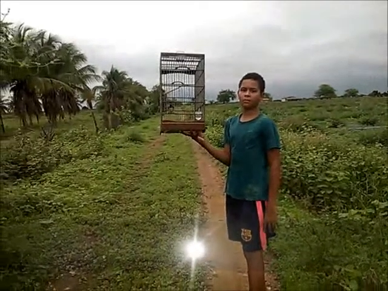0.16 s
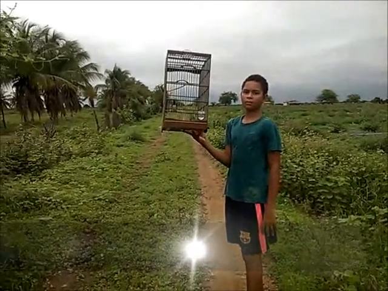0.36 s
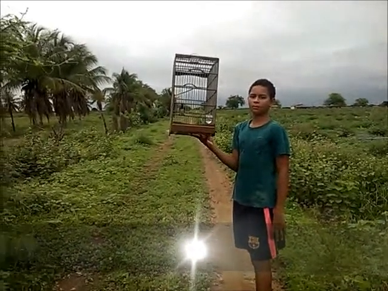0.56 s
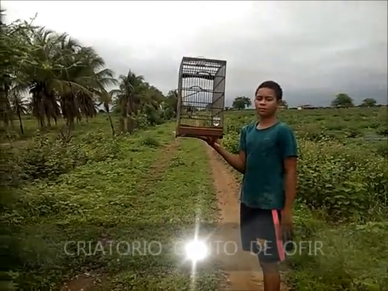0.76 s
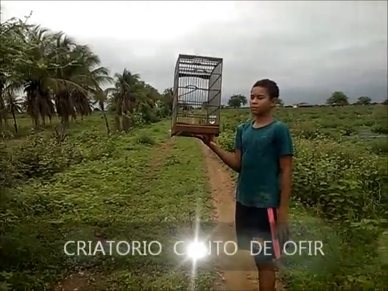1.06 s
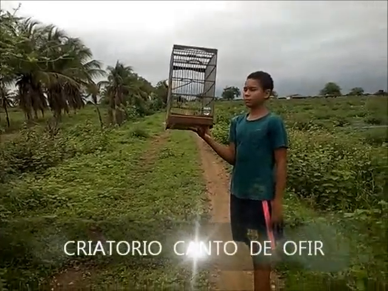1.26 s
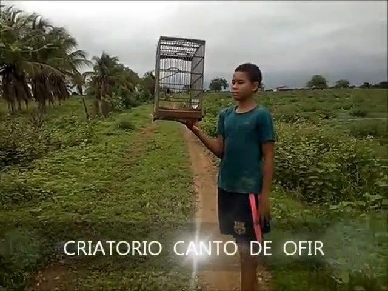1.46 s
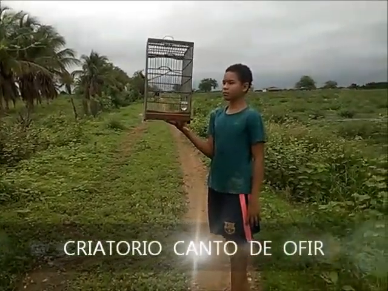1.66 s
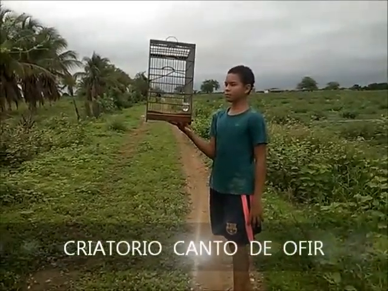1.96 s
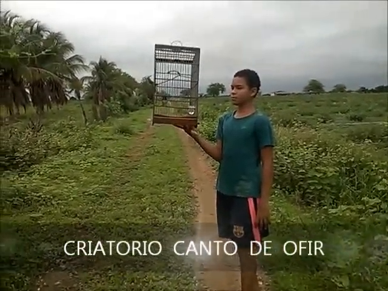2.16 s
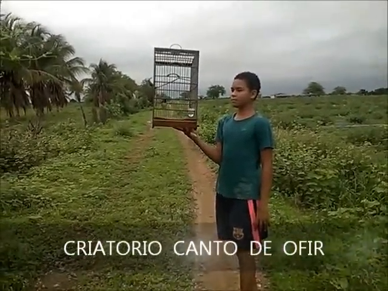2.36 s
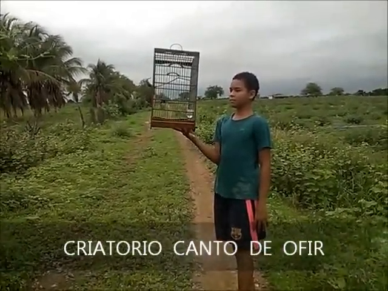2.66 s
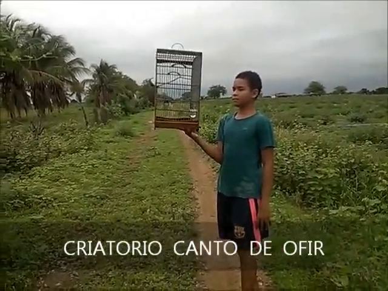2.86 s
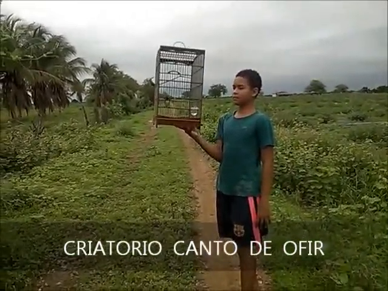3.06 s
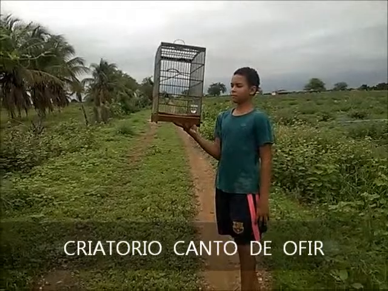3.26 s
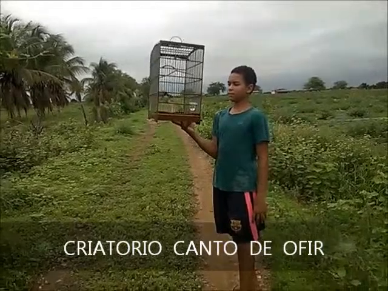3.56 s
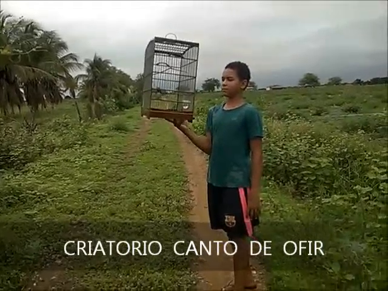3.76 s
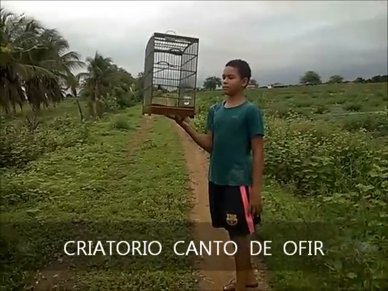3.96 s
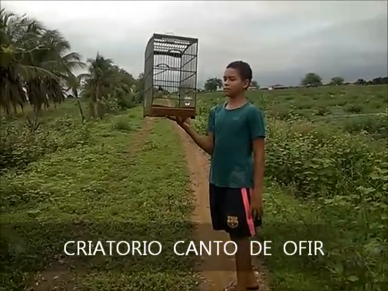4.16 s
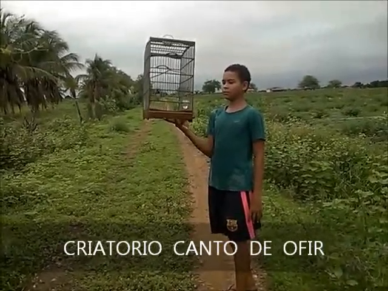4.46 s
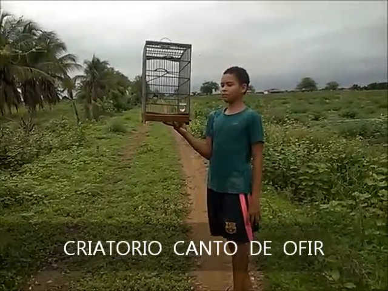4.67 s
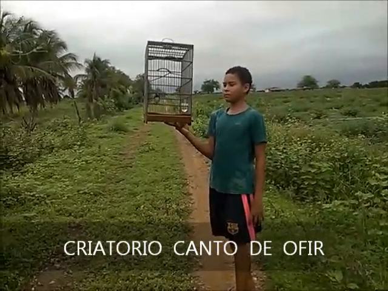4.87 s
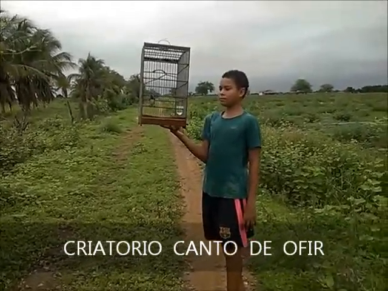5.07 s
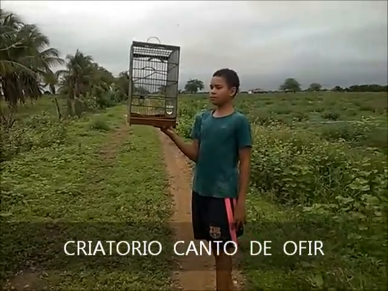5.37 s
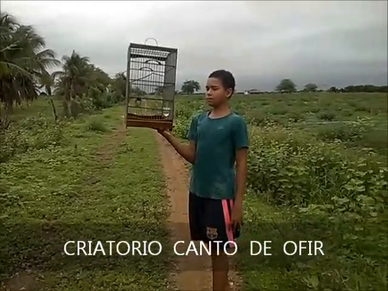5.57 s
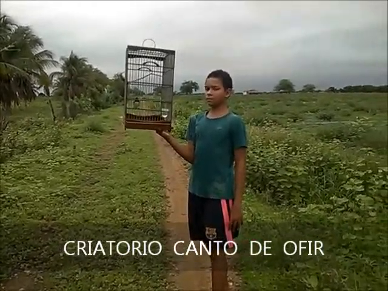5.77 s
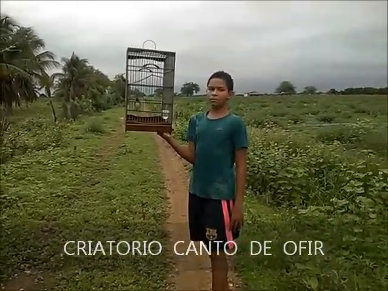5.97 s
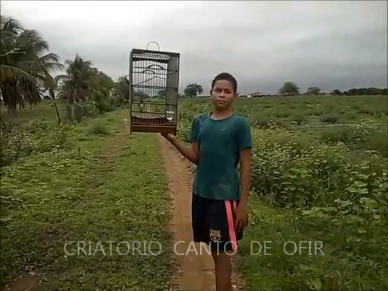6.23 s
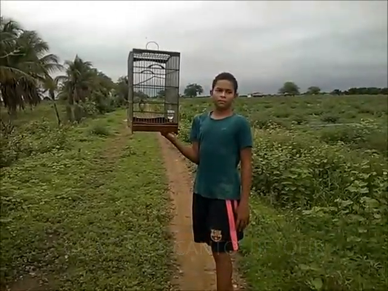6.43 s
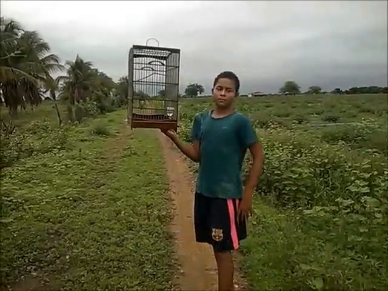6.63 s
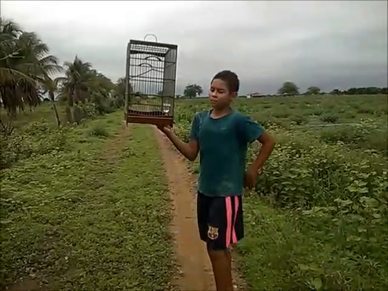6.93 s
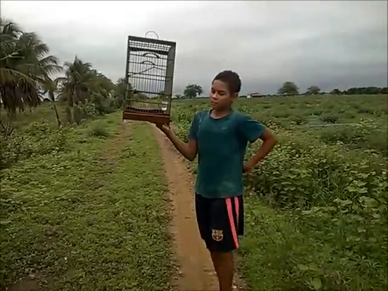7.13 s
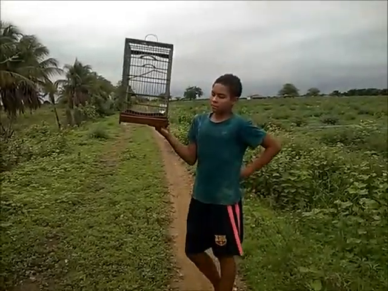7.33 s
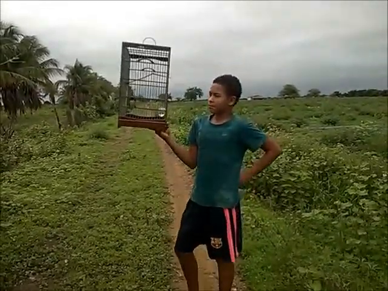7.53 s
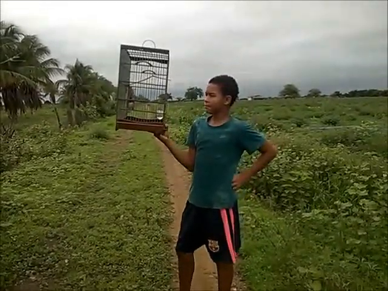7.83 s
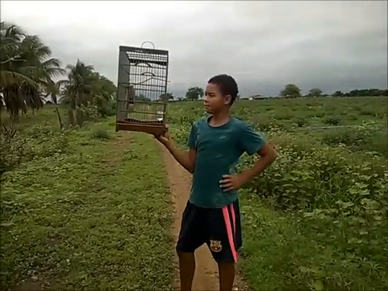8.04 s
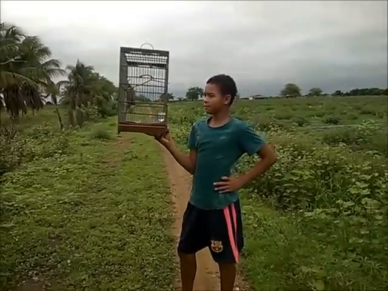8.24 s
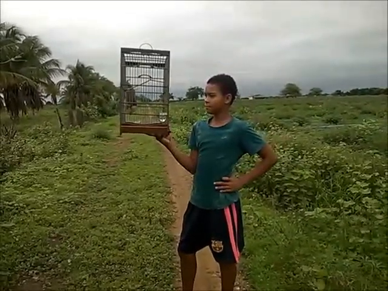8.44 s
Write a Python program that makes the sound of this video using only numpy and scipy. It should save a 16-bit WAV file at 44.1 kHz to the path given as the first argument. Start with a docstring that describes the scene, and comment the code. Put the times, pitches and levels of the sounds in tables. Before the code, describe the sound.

A small songbird in a cage whistles two loud, quick phrases of falling and rising notes, one near the start and one at the end. Between them come quieter high trills, a run of sharp chips and far double pips from wild birds. A cricket and other insects buzz underneath, with a faint far engine hum and soft gusts bumping the single microphone in an open field.

```python
"""An open field. A small caged songbird sings two loud phrases of slurred, rising and diving whistles.
Wild birds trill and chip further off; each voice is a gliding syrinx tone that membrane flutter makes buzz.
A cricket's wing strokes drone in bouts over a shimmer of far insects, a far engine's exhaust hums
and a dove coos. Light wind bumps the single microphone."""
import sys
import numpy as np
from scipy import signal
from scipy.fft import rfft, irfft, next_fast_len
from scipy.io import wavfile
from scipy.ndimage import uniform_filter1d, map_coordinates

SR = 44100
rng = np.random.default_rng(int(sys.argv[2]) if len(sys.argv) > 2 else 0)


def wav_record(signal):
    """Record a signal, one row per channel, as 16-bit PCM in the file named by sys.argv[1]."""
    frames = np.transpose(np.atleast_2d(signal))
    bounded = np.clip(frames, -1, 1)
    # unit amplitude maps onto the largest positive 16-bit level
    quanta = np.round(bounded * 32767).astype(np.int16)
    wavfile.write(sys.argv[1], SR, quanta)


N = 418950

# wild birds' call contours by name: t/s, f/Hz, level/dB, buzz depth/share of f
CALL_CONTOURS = { "zip": [(0, 6170, -6, 0.1), (.012, 6470, 1, 0.15), (.023, 6900, 0.5, .07),
                 (.038, 7960, -6.5, .04)], "tink": [(0, 10900, -13.5, 0), (.003, 9900, -8.5, 0),
                 (.006, 9070, -1, 0.037), (.011, 9350, -6, .02), (.017, 10800, -2.5, 0.081)],
                 "whip": [(0, 8430, -10, 0.0051), (.007, 7342, -11.5, 0.006), (.014, 6110, -4.5, 0.045),
                 (.021, 5280, -9, 0), (.028, 4630, -2.5, 0.02)], "tsip": [(0, 8300, -24, 0.065),
                 (.012, 8520, -6.5, 0.015), (.024, 8450, -2.5, 0.078), (.036, 8000, -9, .11),
                 (.052, 7370, -41, 0.018)], "pip": [(0, 6110, -23, 0.0022), (.01, 5880, -0.5, 0.017),
                 (.02, 5750, 0.5, 0), (.03, 5300, -23, 0.0055)], "chirp": [(0, 3980, -8, 0.01),
                 (.01, 3150, -7.5, 0.012), (.022, 3000, -6, 0.018), (.043, 3060, 0, 0.014),
                 (.06, 2720, -5.5, .025), (.075, 2650, -4.5, 0.022), (.09, 2350, -27, .03)]}


def amp(db):
    """Decibels to gain."""
    return 10 ** (np.asarray(db) / 20)


def unit(x):
    """x at rms 1."""
    return x / np.sqrt(np.mean(x ** 2) + 1e-20)


def curves(rows):
    """One value per sample for each column after t/s."""
    times, *cols = np.transpose(rows)
    return [np.interp(np.arange(N) / SR, times, c) for c in cols]


def wobble(rate_hz, size=N):
    """Smooth random curve with knots at rate_hz."""
    knots = rng.standard_normal(int(size * rate_hz / SR) + 4)
    return map_coordinates(knots, [np.arange(size) * rate_hz / SR])


def filtered(x, response):
    """x through a frequency response."""
    m = next_fast_len(N + SR // 2)
    return irfft(rfft(x, m) * response(np.fft.rfftfreq(m, 1 / SR)), m)[:N]


def noise(colour):
    """Noise of rms 1; colour rows: f/Hz, relative density/dB."""
    f, db = np.transpose(colour)
    white = rng.standard_normal(N)
    return unit(filtered(white, lambda hz: amp(np.interp(np.log(hz + 1), np.log(f), db))))


def add(track, start_s, sound):
    """Mix a sound into the track."""
    start = max(round(start_s * SR), 0)
    part = track[start:start + len(sound)]
    part += sound[:len(part)]


def scatter(x, wet_db, t60_s, delay_s=0.002, above_hz=0):
    """Leaves and wires throw back a short diffuse tail, mostly above above_hz."""
    t = np.arange(SR // 2) / SR
    tail = rng.standard_normal(len(t)) * amp(-60 * t / t60_s) * (t > delay_s)
    wet = signal.fftconvolve(x, tail / np.linalg.norm(tail))[:N]
    return x + amp(wet_db) * filtered(wet, lambda hz: 1 / (1 + (above_hz / (hz + 1)) ** 4))


def echo(x, delay_s, db):
    """One weaker, later copy."""
    return filtered(x, lambda hz: amp(db) * np.exp(-2j * np.pi * hz * delay_s))


def air(hush_db=-56, waver_db=0.4, lumpy_db=3, bump_half_width_s=0.023):
    """A lumpy breeze and its hard bumps on the microphone, over the field's even hush."""
    breeze_course = [(0, -55), (1, -61), (3, -60), (4.1, -56), (4.6, -49), (5, -42), (5.25, -39.5),
                     (5.5, -50), (5.85, -41), (6, -43.5), (6.55, -46.5), (6.8, -61.5), (7.35, -55.5),
                     (7.8, -42.5), (8.1, -48.5), (8.4, -38.5), (8.56, -56), (9.5, -63)]  # t/s, level/dB
    bump_peaks = [(5.33, -34.5), (5.452, -33.5), (5.72, -46), (5.871, -28.5), (6.11, -45), (6.19, -37),
                  (6.3, -33), (6.47, -34), (7.46, -43.5), (7.71, -39.5), (7.85, -29.5), (8.21, -33.5),
                  (8.28, -34.5)]  # t/s, level/dB
    buffet_colour = [(11, -51), (18, 8), (28, 3.5), (40, 1), (108, -21), (145, -22.5), (184, -29.5),
                     (400, -45), (520, -64), (880, -120)]  # f/Hz, density/dB
    hush_colour = [(20, 14), (100, 8.5), (200, 2), (350, 0), (700, -1.5), (1400, -3.5), (2700, -2),
                   (4000, -8), (5400, -1), (6500, -5.5), (10000, -9), (13000, -8), (15500, -9.5)]  # f/Hz, density/dB
    t = np.arange(N) / SR
    breeze_db, = curves(breeze_course)
    breeze = amp(breeze_db) * unit(amp(lumpy_db * wobble(18)))
    bumps = sum(amp(db) * np.exp(-((t - s) / bump_half_width_s) ** 2) for s, db in bump_peaks)
    buffet = np.hypot(breeze, bumps) * noise(buffet_colour)
    hush = amp(hush_db + waver_db * wobble(1.88)) * noise(hush_colour)
    return buffet + hush


def engine():
    """A far engine slows and picks up again; only its low exhaust orders carry."""
    course = [(0, 38.5, -64.5), (1, 40, -67.5), (2, 39.8, -66), (4, 39, -59.5), (5, 38.4, -55),
              (5.3, 37.6, -55.5), (5.7, 34.3, -54.5), (6.15, 35.6, -55), (6.7, 34, -57.5),
              (7.1, 31.5, -66.5), (7.6, 30, -70), (8.1, 30, -64), (8.55, 32, -59.5), (9, 37.8, -57.5),
              (9.5, 37.3, -56.5)]  # t/s, cycle rate/Hz, level/dB
    exhaust = [(2, -7), (3, 0.5), (4, -3.5)]  # order, relative level/dB
    cycle_hz, db = curves(course)
    phase = 2 * np.pi * np.cumsum(cycle_hz * (1 + 0.0026 * wobble(7))) / SR
    hum = sum(amp(order_db + 1.2 * wobble(7.4)) * np.sin(k * phase) for k, order_db in exhaust)
    return amp(db) * unit(hum)


def far_insects(flicker_db=2.9):
    """Many far insects blur into a narrow band of shimmer that comes and goes."""
    course = [(0, -62), (.7, -59), (1, -56), (2.7, -60), (3, -76), (3.4, -58.5), (3.9, -71), (5.2, -74),
              (5.5, -63), (6.5, -61.5), (6.7, -70), (7.1, -56), (8, -59), (8.5, -58.5), (9.5, -54)]  # t/s, level/dB
    colour = [(4500, -43.5), (5150, -17), (5330, -2.5), (5520, -15), (6300, -39.5), (8000, -59)]  # f/Hz, density/dB
    db, = curves(course)
    return amp(db) * unit(amp(flicker_db * wobble(120)) * noise(colour))


def cricket(stroke_hz=59.4, sag_hz=210, cold_detune=0.035):
    """Each wing stroke is a short, sagging tone; a bout warms up in level and pitch, then stops dead."""
    bouts = [(-.2, 0.116, 4890, -51, .03), (0.737, 2.565, 4820, -52.5, .15),
             (3.55, 5.139, 4850, -52.5, .17), (5.324, 5.53, 4855, -50, 0.0325),
             (5.551, 5.91, 4884, -50, 0.0227), (6.7, 8.35, 4825, -52.5, .13)]  # start/s, end/s, f/Hz, level/dB, warm-up/s
    # bouts over 1 s gain a later, higher, weaker tone
    upper = [(start + 0.3, end, hz + 159.4, db - 3, 0.03)
             for start, end, hz, db, _ in bouts if end - start > 1]
    track = np.zeros(N)
    for start, end, hz, db, warm_up_s in bouts + upper:
        t = np.arange(max(start, 0), end, 1 / SR)
        warmth = 1 - 0.9 * np.exp(-(t - start) / warm_up_s)
        stroke = (stroke_hz * t + 0.04 * wobble(12, len(t))) % 1
        pitch_hz = hz * (1 - cold_detune * (1 - warmth)) + sag_hz * (0.5 - stroke)
        pitch_hz += 6 * wobble(9.7, len(t)) + 30 * wobble(500, len(t))
        pulses = np.sin(np.pi * stroke) * np.sin(2 * np.pi * np.cumsum(pitch_hz) / SR)
        add(track, t[0], amp(db + wobble(20.7, len(t))) * warmth * unit(pulses))
    return scatter(track, wet_db=-7, t60_s=0.06)  # grass blurs the strokes


def syrinx(contour, calls, buzz_hz, jitter, harmonics_db=(0,), rasp=0):
    """One gliding whistle per call; fast membrane flutter makes it buzz, uneven flutter makes it rasp."""
    track = np.zeros(N)
    knots_s, *cols = np.transpose(contour)
    for start_s, call_db, stretch, pitch_ratio in calls:
        t = np.arange(int(knots_s[-1] * stretch * SR)) / SR
        hz, db, depth = [uniform_filter1d(np.interp(t, knots_s * stretch, c), size=150) for c in cols]
        pitch_hz = pitch_ratio * hz
        flutter = np.sin(2 * np.pi * np.cumsum(buzz_hz * (1 + 0.1 * wobble(117.7, len(t)))) / SR)
        unsteady = jitter * (1 + 25 * np.abs(depth)) * wobble(891, len(t))
        phase = 2 * np.pi * np.cumsum(pitch_hz * (1 + depth * flutter + unsteady)) / SR
        tone = sum(amp(harmonic_db) * np.sin(k * phase) * (k * pitch_hz < SR / 2)
                   for k, harmonic_db in enumerate(harmonics_db, 1))
        gate = np.clip(np.minimum(t, t[-1] - t) / 0.003, 0, 1)
        gain = amp(call_db + db + 1.5 * wobble(157, len(t)))
        roughness = 1 + rasp * wobble(1500, len(t))
        add(track, start_s, gain * roughness * gate * tone)
    return track


def trilling_bird(reserved_s=0.02, uneven_db=2):
    """A wild bird alternates buzzy zips and high tinks; a slower trill draws its zips longer."""
    # zip pitch ratio, zip's share of the free time, course
    # course: t/s, tink spacing/s, tink level/dB, tink pitch ratio, zip level/dB
    trills = [ (.8, 1, [(.046, 0.1266, -55, 0.89, -58.5), (.85, 0.13, -48.5, 0.88, -54.5)]),
              (0.998, .6, [(1.291, 0.081, -54, 0.96, -49.5), (1.6, .0769, -49, .93, -47.5),
              (1.84, .073, -36.5, 0.91, -44.5), (2.18, .0654, -46, 1.016, -46.5),
              (2.4, 0.061, -48.5, 0.97, -47), (2.81, .049, -40, 1.11, -51)]),
              (1, .47, [(3.93, 0.1, -54, 0.9, -54.5), (4.15, .1006, -40, 1.02, -47),
              (4.7, 0.12, -37.5, .96, -45.5)]), (0.999, 0.53, [(7.611, 0.0838, -46, .88, -47.5),
              (7.95, 0.077, -49.5, 0.96, -44.5), (8.1, .0815, -34.5, .94, -42.5),
              (8.53, .0942, -28.5, .98, -38), (8.85, 0.1198, -31, 1.01, -38),
              (9.07, .134, -31, 1.01, -35.5), (9.25, 0.13, -41, 0.98, -37.5)])]
    zip_contour, tink_contour = CALL_CONTOURS["zip"], CALL_CONTOURS["tink"]
    zips, tinks = [], []
    for zip_pitch, fill, course in trills:
        knots_s, *cols = np.transpose(course)
        s = knots_s[0]
        while s < knots_s[-1]:
            gap_s, tink_db, tink_pitch, zip_db = [np.interp(s, knots_s, c) for c in cols]
            zip_s = fill * max(gap_s - reserved_s, 0.01)  # reserved: the tink and a rest
            zips.append((s - zip_s, zip_db, zip_s / zip_contour[-1][0], zip_pitch))
            tinks.append((s, tink_db + uneven_db * rng.standard_normal(), 1, tink_pitch))
            s += gap_s
    trill = syrinx(zip_contour, zips, buzz_hz=284, jitter=0.01)
    trill += syrinx(tink_contour, tinks, buzz_hz=409, jitter=0.0071, rasp=0.33)
    return scatter(trill, wet_db=-8, t60_s=0.11)


def note(length_s, pitches_hz, peak_db, peak_at, swell_db, sag_db, buzz, buzz_at):
    """Syrinx contour of a song note: it glides, swells, sags and droops in pitch as it closes."""
    attack_s, release_s = 0.016, 0.012
    droop_share, droop_s = 0.19, 0.003
    u = np.linspace(0, 1, 200)
    t, left_s = u * length_s, (1 - u) * length_s
    hz = map_coordinates(np.array(pitches_hz, float), [u * (len(pitches_hz) - 1)], order=2, mode="nearest")
    hz *= 1 - droop_share * np.exp(-left_s / droop_s)
    gate = np.clip(t / attack_s, 1e-3, 1) * np.clip(left_s / release_s, 1e-3, 1)
    db = peak_db + np.interp(u, [0, peak_at, 1], [-swell_db, 0, -sag_db]) + 20 * np.log10(gate)
    depth = buzz * np.interp(u, [0, buzz_at, buzz_at + 0.14], [0.45, 1, 0])
    return np.transpose([t, hz, db, depth])


def caged_bird(brassiness=1.8, bounce_db=-13):
    """Nearly pure whistles; the two sides of the syrinx overlap and beat where notes join."""
    # length/s, f/Hz at five even steps, peak/dB, peak place/0-1, swell/dB, sag/dB,
    # buzz depth/share of f, buzz place/0-1
    notes = { "rasp": (0.13, (3750, 3695, 3417, 3350, 3150), -28, 0.31, 12, 15.5, 0.13, 0.27),
             "slur": (.143, (4210, 3850, 3560, 3430, 3330), -23.4, .75, 11.7, 8, .01, .12),
             "step": (0.11, (3710, 3865, 3480, 3390, 3366), -20.5, 0.21, 6.9, 9.9, 0.017, 0.5),
             "fall": (.12, (4870, 4400, 3980, 3845, 3900), -15.3, .25, 18, 2, .006, .19),
             "hold": (0.07, (3530, 3577, 3520, 3525, 3430), -22.4, 0.5, 13.5, 8.5, 0.014, 0.34),
             "peal": (.105, (5110, 4800, 4420, 4180, 4130), -12, .44, 27, 6, .012, .3),
             "scoop": (0.19, (3150, 2807, 3120, 3866, 4420), -16.5, 1, 11.3, .2, 0.077, 0.49),
             "rise": (0.15, (2846, 2948, 3430, 3970, 4227), -15, 0.85, 10.5, 4.6, 0.046, 0.058),
             "dive": (0.1, (8000, 7010, 6480, 5515, 5750), -21.5, 0.58, 12.4, 12.5, 0.022, 0.43),
             "flick": (0.044, (4000, 4095, 4210, 4665, 4710), -14.5, 0.67, 22.6, 12, 0.012, 0.48),
             "drop": (0.055, (3480, 3647, 3480, 3094, 2980), -23, 0.53, 4.2, 5.9, 0.0091, .4)}
    score = { "rasp": [(.661, 0.5, 0.86, 0.96), (7.995, -1, 0.84, 0.95)], "slur": [(.735, 0.5, 1.028, 0.99),
             (8.057, -2, 1.176, 0.97)], "step": [(.957, 0.5, 0.88, 0.994), (8.303, -0.6, 0.91, 1.002)],
             "fall": [(1.029, -0.5, 1, 1), (8.376, -2.5, 0.97, 0.99)], "hold": [(1.207, 1, 0.95, 1.002),
             (8.548, -3.5, 0.83, 1.01)], "peal": [(1.249, -0.5, 1.045, 0.99), (8.579, -4, 1.22, 0.98)],
             "scoop": [(1.403, 0.5, 0.95, 0.99), (8.751, -0.5, 0.9, 0.98)], "rise": [(1.631, 0, 0.94, 1),
             (8.978, -2.5, 0.9, 0.98), (9.155, -3, 0.88, 0.98)], "dive": [(1.825, 1, 0.99, 0.99),
             (2.049, 0, 1, 1), (9.344, 1.5, 1, 1.004)], "flick": [(1.902, -1.5, 0.96, 1),
             (2.125, -2.5, 0.92, 0.99), (9.421, -1.3, .926, .991)], "drop": [(1.931, 3, 0.97, 0.99),
             (2.149, 3.2, 1.16, 0.97), (9.453, 2.8, 1.09, 0.98)]}  # by note: t/s, gain/dB, length ratio, pitch ratio
    bounce_course = [(2.3, .00204), (8, .00192)]  # near reflection, shifting as the cage is moved: t/s, delay/s
    buzz_hz = {"rasp": 215, "scoop": 165}
    song = sum(syrinx(note(*notes[name]), score[name], buzz_hz.get(name, 170),
                      jitter=0.0012, harmonics_db=(0, -56)) for name in notes if name != "dive")
    song += brassiness * song ** 3  # third harmonic on loud notes
    # the high dive is forced: rougher, with a weak octave and hiss; the wires scatter it most
    dive = syrinx(note(*notes["dive"]), score["dive"], buzz_hz=310, jitter=0.003,
                  harmonics_db=(0, -29), rasp=0.15)
    hiss = noise([(3000, -42), (5000, 0), (9000, -5), (12000, -10), (16000, -10.5)])
    hiss *= amp(-23.5) * uniform_filter1d(np.abs(dive), size=300)
    song += scatter(dive, wet_db=-0.5, t60_s=0.085) + hiss
    # the reflection ripples the level as the pitch sweeps
    bounce_s, = curves(bounce_course)
    bounce = amp(bounce_db) * map_coordinates(song, [np.arange(N) - bounce_s * SR])
    field_echo = echo(song, delay_s=0.016, db=-22)
    return scatter(song + bounce + field_echo, wet_db=-14, t60_s=0.15, above_hz=6000)


def far_birds():
    """Far double pips, and faint slurs from the hedges."""
    pairs = [(.68, -45), (1.139, -42), (2.573, -45), (3.033, -43.5), (4.825, -44.5), (5.227, -44.5),
             (5.709, -49.5), (6.133, -48), (6.6, -49.5), (7.1, -48.5), (7.715, -47), (8.139, -48)]  # t/s, gain/dB
    slur_contours = { "up": [(0, 3090, -4, .01), (.03, 3460, 3.5, .015), (.07, 4300, -7, .02)],
                     "down": [(0, 4510, -5, .005), (.03, 4230, 2, .005), (.075, 3950, -13, .005)],
                     "whisk": [(0, 5400, 8, 0.016), (.015, 4380, -7, 0), (.035, 3500, -14, 0)]}  # t/s, f/Hz, level/dB, buzz depth/share of f
    slurs = { "up": [(3.26, -57, 1, 0.94), (6.122, -60, .3, 1.53), (6.41, -55, 0.27, 1.5),
             (7.03, -51, 0.92, 1.46)], "down": [(5.815, -51, 1, 1)], "whisk": [(6.355, -52.5, 1, 1)]}  # by contour: t/s, gain/dB, length ratio, pitch ratio
    pips = [(s + lag_s, db + accent_db, 1, 1)
            for s, db in pairs for lag_s, accent_db in [(0, -3.5), (0.05, -0.1)]]
    calls = syrinx(CALL_CONTOURS["pip"], pips, buzz_hz=200, jitter=0.003)
    calls += sum(syrinx(slur_contours[name], slurs[name], buzz_hz=198, jitter=0.0043) for name in slurs)
    return scatter(calls, wet_db=-15, t60_s=0.24, delay_s=0.0057)


def chipping_birds():
    """Thin contact calls and a run of whipped chips, scattered by leaves."""
    tsips = [(3.53, -41, 0.88, 0.98), (3.68, -41, 1.52, 0.96), (5.136, -40, 1, 1), (6.285, -42, 1.16, 0.99),
             (6.924, -44.5, 1.08, 0.972), (7.4, -43, 1.3, 0.96)]  # t/s, gain/dB, length ratio, pitch ratio
    whips = [(4.016, -38, 1, 1.1), (4.115, -35.5, 0.99, 1.01), (4.219, -37, 1, 1.01),
             (4.321, -32.5, 0.87, 1.02), (4.424, -32, 0.93, 1.02), (4.528, -31, .85, 1),
             (4.643, -31.5, 0.91, 1)]  # same columns
    calls = syrinx(CALL_CONTOURS["tsip"], tsips, buzz_hz=324, jitter=0.012, rasp=0.47)
    calls += syrinx(CALL_CONTOURS["whip"], whips, buzz_hz=297, jitter=0.018, rasp=0.61)
    return scatter(calls, wet_db=-2, t60_s=0.13)


def harsh_chirp():
    """Both sides of the syrinx at once; the throat favours overtones between 4 and 8 kHz."""
    sides = [(6.778, -33, 0.98, 0.99), (6.783, -29, .9, .8)]  # t/s, gain/dB, length ratio, pitch ratio
    upper = syrinx(CALL_CONTOURS["chirp"], sides[:1], buzz_hz=373, jitter=0.0095,
                   harmonics_db=(-8.5, 1.5, -16, -24, -22, -22), rasp=0.3)
    lower = syrinx(CALL_CONTOURS["chirp"], sides[1:], buzz_hz=323, jitter=0.0035,
                   harmonics_db=(-16, 1, -4, -26.5, -34, -26), rasp=0.2)
    return scatter(upper + lower, wet_db=-8, t60_s=0.11)


def dove(coo_hz=660, half_width_s=0.12):
    """Soft distant coos: swells of one wavering tone, barely above the hush."""
    coos = [(6.92, -68), (7.66, -70), (8.32, -69), (8.98, -67.5)]  # centre t/s, level/dB
    t = np.arange(N) / SR
    tone = np.sin(2 * np.pi * np.cumsum(coo_hz + 14 * wobble(60)) / SR)
    return tone * sum(amp(db) * np.exp(-((t - s) / half_width_s) ** 2) for s, db in coos)


def scene():
    """One microphone feeds both channels."""
    background = air() + engine() + far_insects() + cricket()
    birds = trilling_bird() + caged_bird() + far_birds() + chipping_birds() + harsh_chirp() + dove()
    mono = background + birds
    return np.array([mono, mono])


def record(dry):
    """Brick-wall low-pass at 15750 Hz."""
    return np.array([filtered(x, lambda hz: hz < 15750) for x in dry])


dry = scene()
out = record(dry)
wav_record(out)
```